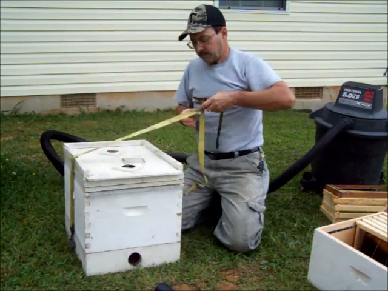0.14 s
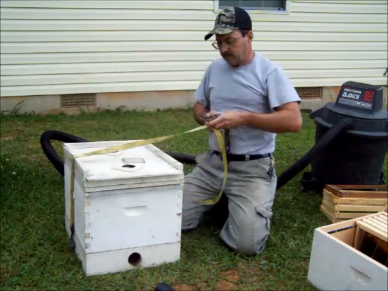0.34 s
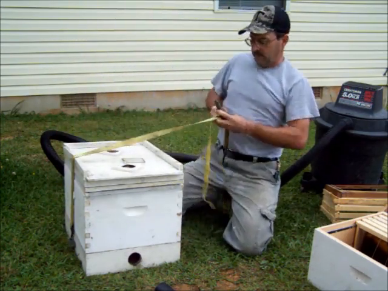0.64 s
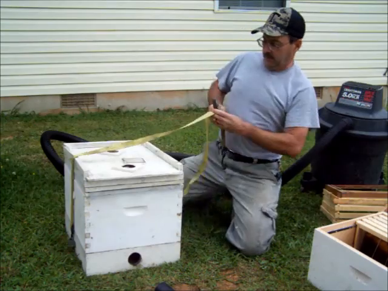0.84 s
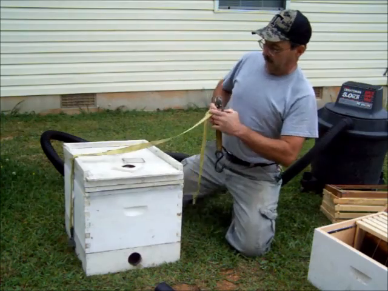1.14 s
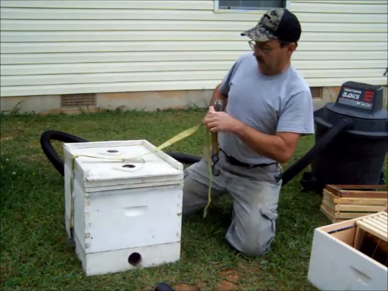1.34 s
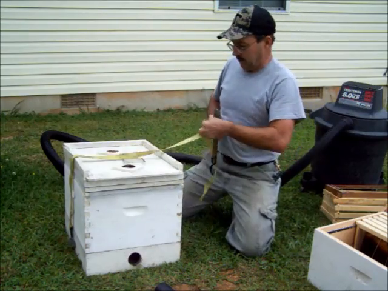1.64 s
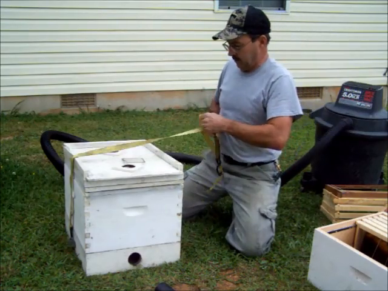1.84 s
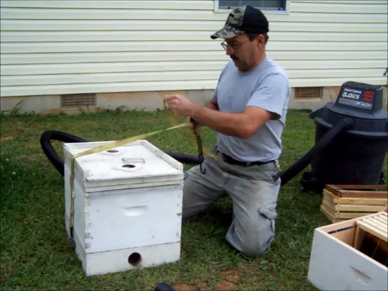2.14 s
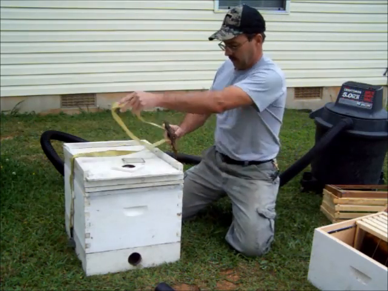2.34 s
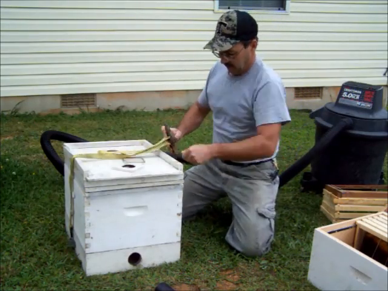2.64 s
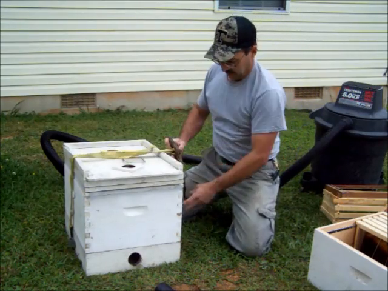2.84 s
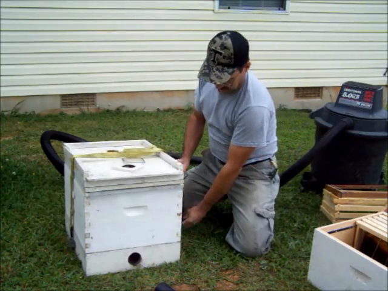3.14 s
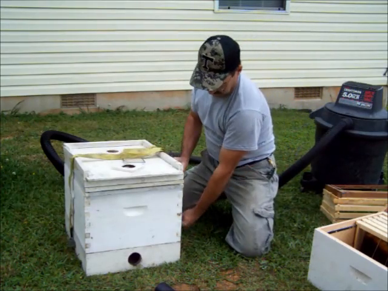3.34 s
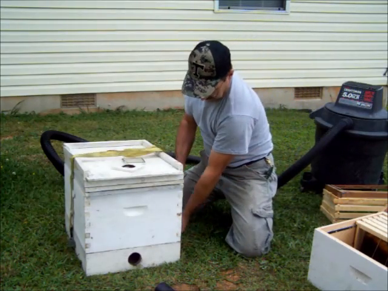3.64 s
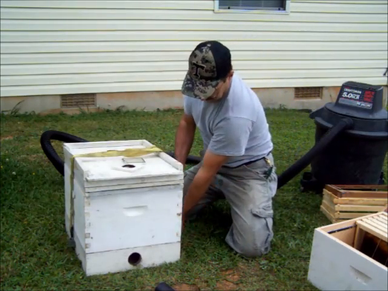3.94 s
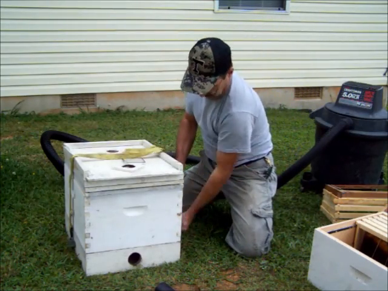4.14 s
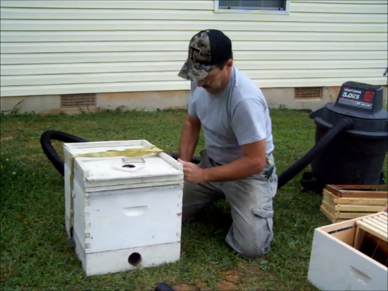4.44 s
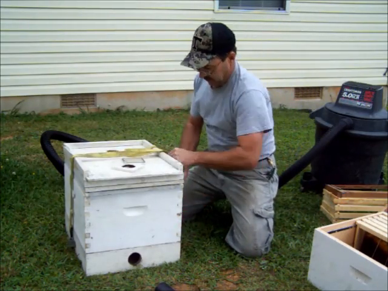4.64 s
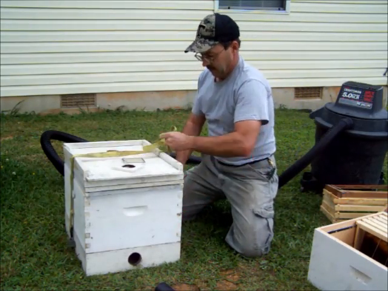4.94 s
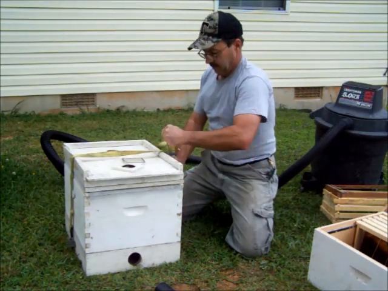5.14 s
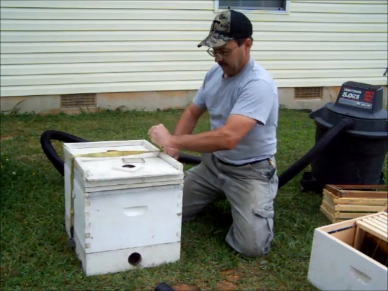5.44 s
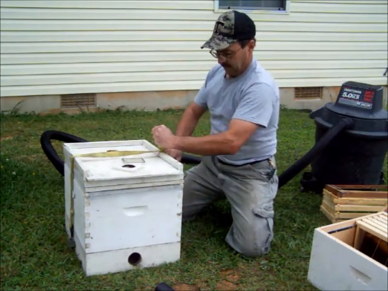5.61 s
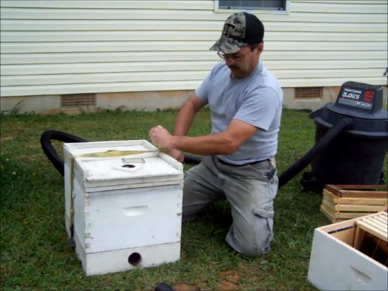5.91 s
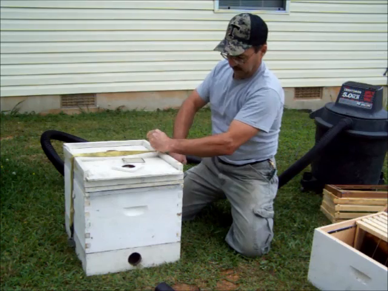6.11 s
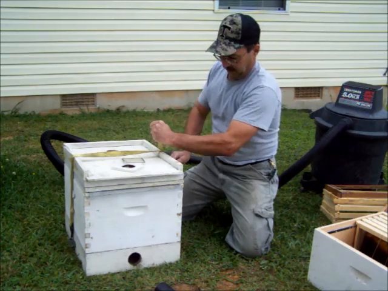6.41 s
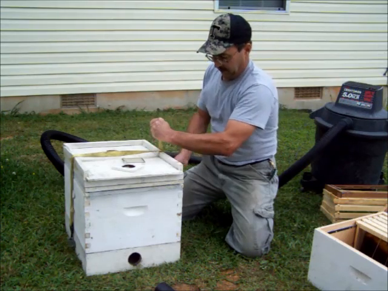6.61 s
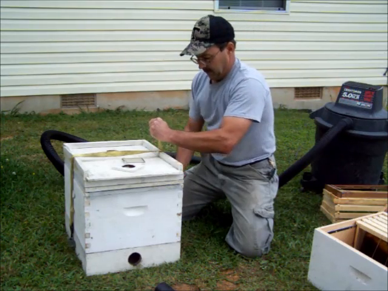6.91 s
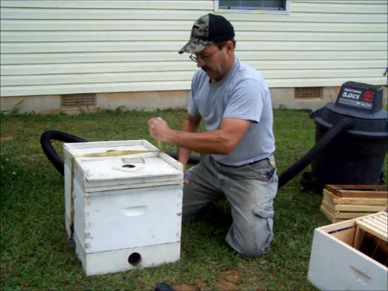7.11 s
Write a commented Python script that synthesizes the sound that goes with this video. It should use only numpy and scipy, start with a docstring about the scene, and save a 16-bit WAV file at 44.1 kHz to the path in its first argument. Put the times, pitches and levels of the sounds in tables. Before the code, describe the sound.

Outdoors, a strap ratchet gives a lone loud click, later a hook clank, then a quick run of sharp clicks and hollow wooden box knocks.

```python
"""Ratchet strap on a hollow box

Outdoors by a house wall a strap ratchet is cranked tight round a hollow wooden box. Pawl clicks, blows
on the box, clanks of a steel hook and dry ticks are sums of decaying modes, echoed by the slatted wall.
Shaped noise gives the swishing strap, the droning box, the wind on the microphone and the air hiss.
Gliding sines sing a bird's repeated phrase and a fainter bird; insects are throbbing noise and a whine.
A far engine is three multiples of its firing rate with a band of exhaust roar."""
import sys
import numpy as np
from scipy import signal
from scipy.fft import rfft, irfft
from scipy.io import wavfile
from scipy.ndimage import uniform_filter1d

SR = 44100
rng = np.random.default_rng(int(sys.argv[2]) if len(sys.argv) > 2 else 0)


def volts(x):
    """Linear amplitude factor 10**(x/20) for a level x in dB, scalar or array-like."""
    e = np.asarray(x, float) / 20
    return 10 ** e


def int16_out(signal):
    """Quantize to a 16-bit WAV file."""
    q = np.round(np.clip(np.atleast_2d(signal).T, -1, 1) * 32767)
    wavfile.write(sys.argv[1], SR, q.astype(np.int16))


N = 320607

# pawl snapping over a tooth; the last row is a strong wall echo of the click at 7.218 s, about 3.4 kHz:
# t/s, peak level/dB, brightest f/Hz, level an octave off it/dB, wall echo/dB
RATCHET_CLICKS = [(2.4308, -25.5, 4100, -8, -14), (5.9946, -22, 3750, 0, -7),
                  (6.1864, -21.5, 3900, -9.5, -5.5), (6.278, -31, 4800, -4.5, -8),
                  (6.4478, -3.5, 4260, -8.5, -10), (6.508, -30.5, 5700, -9, -14),
                  (6.5563, -25.5, 4140, -5, -16), (6.7977, -4.5, 4330, -7, -7.5),
                  (6.8581, -1.5, 4800, -4.5, -12.5), (6.916, -29.5, 3930, -6, -3),
                  (7.052, -23.5, 3970, -10, -7.5), (7.146, -7, 4130, -5.5, -8),
                  (7.1916, -22.5, 3890, -5, -2), (7.218, -3, 3900, -4, -9.5), (7.2372, -16, 3400, -6, -13)]
# blows on the box: t/s, peak level/dB, hardness/(dB per octave), level of hollow modes/dB, wall echo/dB
BOX_KNOCKS = [(2.432, -3, -4, -1, -15.5), (3.684, -26.5, -2.5, 0.5, -16), (3.76, -16, -1.5, -10, -15.5),
              (3.858, -18, -3.5, -6.5, -12), (6.28, -6, -3, 6.5, -3), (6.451, -16.5, -2.5, 8, -5.5),
              (6.555, -4.5, -1, 8.5, -18), (6.66, -10, -3, 6.5, -10.5), (6.791, -26.5, -14, -6, -23),
              (6.829, -15.5, -12, -2.5, -18), (6.886, -16, -9.5, -6.5, -13), (6.917, -22.5, -7, -1, -17.5),
              (6.95, -25, -7, -6, -21), (7.052, -24, -10, 0, -7.5), (7.116, -15.5, -14, -8, -15),
              (7.151, -19, 7, 16, -16), (7.23, -11.5, -10, 5, -11), (7.241, -9.5, -4, 5, -4.5)]
# hook dropping on the box edge: t/s, peak level/dB, contact length/ms, wall echo/dB
HOOK_CLANKS = [(4.016, -10, 2.76, -16), (4.032, -13, 3.0, -12), (4.08, -12.5, 3.0, -21)]
# small dry ticks: t/s, peak level/dB, centre f/Hz
DRY_TICKS = [(0.066, -19, 2940), (0.754, -36.5, 6070), (1.021, -36.5, 6360), (1.838, -42, 7170)]
# modes of the ratchet, the box and the steel hook: f/Hz, relative level/dB, nominal 60 dB decay time/s
RATCHET_MODES = [(1700, -21, .006), (2200, -13, 0.011), (2720, -9, 0.015), (3420, -6.5, 0.0085),
                 (3400, -6, 0.0069), (4130, 1.5, 0.016), (4245, -2.5, 0.0074), (4800, -5, 0.015),
                 (4740, -3.5, 0.0061), (5320, -10.5, 0.0092), (5870, -7.5, 0.016), (6200, -2.5, 0.0042),
                 (6740, -7, .008), (7260, -14, .007), (7600, -14, 0.0073)]
BOX_MODES = [(164, -13, 0.057), (226.9, 1, 0.1), (259.2, -4.5, 0.13), (326, -7.5, 0.09), (391, -4.5, 0.063),
             (500, -11.5, 0.082), (578, -2.5, 0.071), (646, -7.5, 0.061), (702, -8, 0.035),
             (830, -7, 0.047), (932, -2.5, 0.032), (955, -2, 0.025), (1132, -12, 0.074), (1430, -10, 0.012),
             (1560, -15.5, 0.086), (1834, -8, 0.038), (2115, -15.5, .025), (2406, -12.5, 0.034),
             (2840, -9, .02)]
HOOK_MODES = [(349, -1.5, 0.12), (536, -12, 0.21), (613, -6.5, 0.095), (681, -1, 0.065), (969, -5, 0.031),
              (1283, -5.5, 0.05), (1670, -15, 0.029), (1900, -11.5, 0.11), (2520, -9, 0.027),
              (2880, -8.5, 0.019), (3320, -24, .02), (3620, -8, 0.033), (3750, -11.5, .02),
              (4400, -14, .02), (4140, -5.5, 0.028), (4084, -3.5, 0.028), (4700, -13, 0.037),
              (5140, -7, 0.018), (5800, -10, 0.014), (6240, -14, 0.014), (7100, -15.5, 0.01)]
# box droning under the working hands and the taut strap: middle t/s, length/s, level/dB
BOX_DRONE = [(3.85, .6, -51.5), (6.1, .4, -46), (6.5, 0.76, -37.5), (6.95, .6, -44)]
# strap and cloth swishing: middle t/s, length/s, level/dB
STRAP_SWISHES = [(.78, 0.12, -56.5), (.9, 0.23, -65), (2.22, .3, -55), (3.35, 0.27, -66.5),
                 (4.83, .25, -61), (5.0, .12, -61), (6.1, 0.57, -65), (7.2, 0.55, -59)]
# the bird's phrase, five whistles; the accelerating rise takes two rows, a flat start and a steep end:
# start t/s, length/s, from f/Hz, to f/Hz, glide bend exponent, level/dB
BIRD_PHRASE = [(-.008, .12, 2770, 2430, .8, -46), (.153, .034, 2760, 3020, 1, -44.5),
               (.203, .016, 3400, 3520, 1, -49), (.217, .019, 3620, 4220, 1, -38.5),
               (.288, .014, 4600, 4750, 1, -50), (.312, .032, 2600, 2110, .25, -52)]
# phrases sung: t/s, level added to the whistles/dB, stretch of their spacing
BIRD_SONG = [(1.353, 6, 1.02), (1.774, 6.5, 1.014), (2.197, 7, 1.03), (4.44, 0.5, 1.05), (4.861, 6, 1.02),
             (5.288, 6, 1.03)]
# second, farther bird: start t/s, length/s, from f/Hz, to f/Hz, level/dB
FAR_BIRD_NOTES = [(1.47, .045, 6750, 6600, -59), (1.665, .06, 6300, 5600, -60),
                  (1.77, .06, 6000, 5700, -60)]
# insect chorus: centre f/Hz, width/Hz, level/dB, throb rate/Hz
INSECT_CHORUS = [(3900, 150, -55, 72), (4450, 480, -55.5, 60)]
# thin whine of one insect close by: middle t/s, length/s, level/dB
INSECT_WHINE = [(6.255, .07, -46.5), (6.36, 0.21, -40), (6.55, 0.45, -51.5)]
# far engine, steady part: multiple of the firing rate, level/dB
ENGINE_ORDERS = [(2, -55), (3, -52.5), (6, -59.5)]
# far engine, each multiple louder for a while: multiple, middle t/s, length/s, level/dB
ENGINE_SWELLS = [(2, 2.63, 3.7, -47), (2, 5.5, 2.8, -51.5), (3, 1.06, 1.96, -53), (3, 5.15, 2.8, -52),
                 (3, 6.7, 2.7, -40.5), (6, .2, .7, -57), (6, 1.38, 1, -44), (6, 3.3, 1.45, -44.5),
                 (6, 4.24, 0.85, -45.5)]
# gusts on the microphone: middle t/s, length/s, rumble level/dB, flutter level/dB
WIND_GUSTS = [(0.096, 0.22, -53, -66), (.9, 1, -56, -58.5), (3.905, 0.72, -45.5, -45),
              (4.605, .25, -44.5, -53), (5.16, 0.5, -39, -65), (5.456, 0.37, -50, -54.5),
              (5.895, 0.51, -30, -40.5), (6.156, 0.67, -38.5, -37), (6.924, 0.38, -38.5, -40.5),
              (7.24, 0.16, -43, -34)]
# spectrum of the air hiss: f/Hz, relative level/dB
AIR_SPECTRUM = [(71, -29.5), (120, -8.5), (231, -7.5), (290, -4), (436, -7.5), (839, -5.5), (1960, -10.5),
                (3270, -11), (3900, -7.5), (5090, -18.5), (7250, -29.5), (7780, -45), (8200, -51.5),
                (10700, -74), (18000, -120)]


def strike(modes, ms, peak_db, colour_db=0, ring=1, detune=0.018):
    """Modal excitation: a chattering contact starts each decaying mode at its own instant."""
    hz, db, t60 = np.transpose(modes)[:, :, None]
    level_chance, pitch_chance, sign_chance = rng.standard_normal((3, len(modes), 1))
    delay = np.sqrt(rng.random((len(modes), 1))) * ms / 1000  # s, most near the end of the contact
    t = np.clip(np.arange(SR // 4) / SR - delay, 0, None)
    gain = volts(db + colour_db + 1.5 * level_chance) * np.sign(sign_chance)
    swell = 1 - np.exp(-t * hz / 0.38)  # a mode needs part of a cycle to get going
    tone = np.sin(2 * np.pi * hz * (1 + detune * pitch_chance) * t)
    decay = volts(-60 * t / (t60 * ring))
    y = (gain * swell * tone * decay).sum(axis=0)
    return y * volts(peak_db) / np.abs(y).max()


def add(out, s, sound, echo_db):
    """Superposition at time s: row 0 goes straight to the microphone, row 1 towards the wall."""
    i = int(s * SR)
    out[:, i:i + len(sound)] += sound[:N - i] * volts(np.array([[0], [echo_db]]))


def band(lo_hz, hi_hz):
    """Band-limited noise of unit rms."""
    sos = signal.butter(2, [lo_hz, hi_hz], "bandpass", fs=SR, output="sos")
    x = signal.sosfilt(sos, rng.standard_normal(N))
    return x / x.std()


def walk(rate):
    """Slow random modulation: levels held 1 / rate s and smoothed twice; spread near 1."""
    k = int(SR / rate)
    held = np.repeat(rng.standard_normal(N // k + 1), k)
    return 1.16 * uniform_filter1d(uniform_filter1d(held, k), k)[:N]


def swells(table):
    """Envelope: rows of (middle s, length s, dB) as smooth cosine-squared rises and falls of gain."""
    t = np.arange(N) / SR
    return sum(volts(db) * np.cos(np.pi * np.clip((t - s) / length, -.5, .5)) ** 2
               for s, length, db in table)


def ratchet():
    """Impact of pawl, spring and lever, all bouncing for a few ms; modes near the brightest f win."""
    out = np.zeros((2, N))
    modes = np.tile(RATCHET_MODES, (3, 1))  # three detuned copies of each mode, for a denser click
    for s, db, bright_hz, focus_db, echo_db in RATCHET_CLICKS:
        octaves_off = np.log2(modes[:, :1] / bright_hz)
        click = strike(modes, 3.5, db, focus_db * octaves_off ** 2, detune=0.04)
        add(out, s - .002, click, echo_db)
    return out


def box():
    """Panel resonance: soft blows leave out upper modes, mid-panel blows wake the hollow low ones."""
    hollow_hz, copy_db = 290, -6
    out = np.zeros((2, N))
    modes = np.tile(BOX_MODES, (2, 1))
    hz = modes[:, :1]
    # a weaker, slightly detuned copy of each mode, for a denser knock
    is_copy = np.arange(len(modes))[:, None] >= len(BOX_MODES)
    for s, db, tilt_db, hollow_db, echo_db in BOX_KNOCKS:
        colour_db = tilt_db * np.log2(hz / BOX_MODES[1][0])
        colour_db = colour_db + hollow_db * (hz < hollow_hz) + copy_db * is_copy
        add(out, s - .002, strike(modes, 2.046, db, colour_db, ring=0.91, detune=0.035), echo_db)
    # too small to radiate deep bass
    return signal.sosfilt(signal.butter(2, 120, "highpass", fs=SR, output="sos"), out)


def hook():
    """Repeated impact: a steel hook lands on the wood, then rattles in ever weaker bounces."""
    out = np.zeros((2, N))
    for s, db, ms, echo_db in HOOK_CLANKS:
        add(out, s - .001, strike(HOOK_MODES, ms, db), echo_db)
        for after in np.sort(rng.random(4)) * 0.052:
            bounce_db = db - 9.0 - 250 * after
            add(out, s + after, strike(HOOK_MODES, ms, bounce_db, ring=.7, detune=0.053), echo_db)
    return out


def ticks():
    """Short decay: a cluster of very brief modes round one pitch."""
    t60_s, spread_oct = 0.011, .45
    out, off = np.zeros((2, N)), np.linspace(-1.5, 1.5, num=13)
    for s, db, hz in DRY_TICKS:
        modes = np.transpose([hz * 2 ** (spread_oct * off), -4 * off ** 2, t60_s + 0 * off])
        add(out, s - .002, strike(modes, 3.2, db, detune=0.03), echo_db=-20)
    return out


def handling():
    """Friction: low, uneven rubbing noise in the range of the box's hollow modes."""
    return swells(BOX_DRONE) * volts(2.8 * walk(25)) * band(170, 327)


def rustle():
    """Friction noise: grainy treble swishes of strap and cloth over a faint steady rustle."""
    steady_db = -65
    return (volts(steady_db) + swells(STRAP_SWISHES)) * volts(1.3 * walk(40)) * band(4300, 7800)


def bird():
    """Frequency glide and scattering: five whistles, unsteady with distance and blurred by trees."""
    trees_db, trees_t60_s = -34, .22
    out, flutter = np.zeros((2, N)), volts(3.5 * walk(80))
    for s, db, stretch in BIRD_SONG:
        chances = rng.standard_normal((len(BIRD_PHRASE), 2))  # each phrase a little different
        for glide, (off, push) in zip(BIRD_PHRASE, chances):
            start, length, from_hz, to_hz, bend, glide_db = glide
            u = np.linspace(0, 1, int(length * SR))
            hz = (from_hz + (to_hz - from_hz) * u ** bend) * (1 + 0.003 * off)
            shape = volts(db + glide_db + 0.5 * push) * np.sin(np.pi * u ** 1.1) ** 0.42
            tone = shape * np.sin(2 * np.pi * np.cumsum(hz) / SR)
            add(out, s + start * stretch, tone, echo_db=-13)
    t = np.arange(SR // 3) / SR
    trees = rng.standard_normal(len(t)) * volts(trees_db - 60 * t / trees_t60_s)
    out[0] += signal.fftconvolve(out[0], trees)[:N]
    return out * flutter


def far_bird():
    """Amplitude fluctuation: thin falling whistles, roughened by the distance."""
    out = np.zeros((2, N))
    for s, length, from_hz, to_hz, db in FAR_BIRD_NOTES:
        u = np.linspace(0, 1, int(length * SR))
        phase = 2 * np.pi * np.cumsum(from_hz + (to_hz - from_hz) * u) / SR
        add(out, s, volts(db) * np.sin(np.pi * u) * np.sin(phase), echo_db=-9)
    return out * volts(5 * walk(300))


def wall(x):
    """Reflection and scattering: one clear bounce off the house, the slats' scatter, a faint yard tail."""
    wall_s = .0184
    # levels before the differencing below
    slats_db, slats_t60_s, yard_db, yard_t60_s = -23, 0.061, -42, 0.48
    t = np.arange(SR // 3) / SR
    late = np.clip(t - wall_s, 0, None)
    decay = volts(slats_db - 60 * late / slats_t60_s) + volts(yard_db - 60 * late / yard_t60_s)
    echo = (t > wall_s) * rng.standard_normal(len(t)) * decay
    echo = np.diff(echo, prepend=0)  # favours the treble, which narrow slats scatter
    echo[int(wall_s * SR)] = 1
    return x[0] + signal.fftconvolve(x[1], echo)[:N]


def insects():
    """Amplitude modulation: throbbing noise bands of many far insects, and a near whine."""
    whine_hz = 4800
    out, t = 0, np.arange(N) / SR
    for hz, width_hz, db, rate in INSECT_CHORUS:
        throb = 1 + 0.71 * np.sin(2 * np.pi * rate * t + 2.2 * walk(2.3))
        out = out + volts(db + 1.2 * walk(5)) * throb * band(hz - width_hz / 2, hz + width_hz / 2)
    whine = np.sin(2 * np.pi * whine_hz * t + 1.2 * walk(36))
    return out + np.sqrt(2) * swells(INSECT_WHINE) * whine


def engine():
    """Harmonics: three wavering multiples of the firing rate; exhaust roar swells with the top one."""
    firing_hz = 45.15
    phase = 2 * np.pi * np.cumsum(firing_hz * (1 + 0.0026 * walk(2.45))) / SR
    lines = 0
    for multiple, db in ENGINE_ORDERS:
        rows = [row[1:] for row in ENGINE_SWELLS if round(row[0]) == round(multiple)]
        gain = volts(db) + swells(rows)
        lines = lines + gain * volts(2.5 * walk(8)) * np.sin(round(multiple) * phase)
    roar = volts(-5.5) * gain * band(280, 345)  # gain of the last, top multiple
    return lines + roar


def wind():
    """Turbulent pressure: a light breeze, and gusts that buffet the microphone in lumps."""
    breeze_rumble_db, breeze_flutter_db, lump_db = -53.5, -50.5, 3.5
    rows = np.array(WIND_GUSTS)
    rumble = swells(rows[:, [0, 1, 2]]) * volts(lump_db * walk(12))
    flutter = swells(rows[:, [0, 1, 3]]) * volts(lump_db * walk(20))
    low = (volts(breeze_rumble_db) + rumble) * band(30, 85)
    return low + (volts(breeze_flutter_db) + flutter) * band(70, 199.4)


def air():
    """Spectrally shaped noise: smooth far hiss that slowly fades, with a slight flicker."""
    start_db, fade_db_per_s = -41.5, -0.34
    hz, db = np.transpose(AIR_SPECTRUM)
    f = np.arange(N // 2 + 1) * SR / N
    shape = volts(np.interp(np.log(f + 1), np.log(hz), db))
    hiss = irfft(rfft(rng.standard_normal(N)) * shape, N)
    level_db = start_db + fade_db_per_s * np.arange(N) / SR + .8 * walk(16)
    return volts(level_db) * hiss / hiss.std()


def scene():
    """Superposition: sounds with their wall echo, over the drone of the box and the outdoor floor."""
    echoed = wall(ratchet() + box() + hook() + ticks() + bird() + far_bird())
    unechoed = handling() + rustle() + insects() + engine() + wind() + air()
    return (echoed + unechoed)[None]


def roll_off(x):
    """The treble ends steeply here."""
    return signal.sosfilt(signal.butter(12, 8430, fs=SR, output="sos"), x)


def record(dry):
    """Low-pass filtering: a small microphone with a steep top cut at 7730 Hz."""
    mix = signal.sosfilt(signal.cheby1(10, 1, 7730, fs=SR, output="sos"), dry)
    return roll_off(mix)


dry = scene()
out = record(dry)
int16_out(out)
```